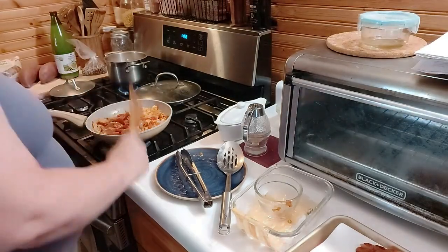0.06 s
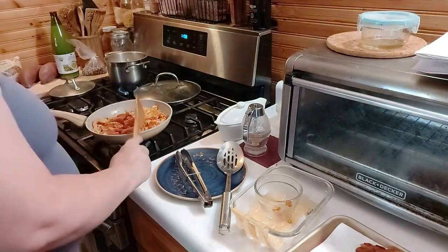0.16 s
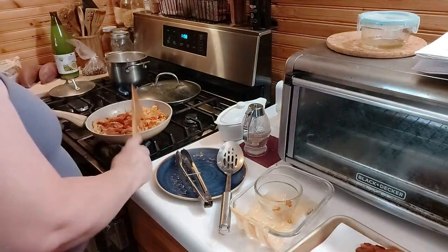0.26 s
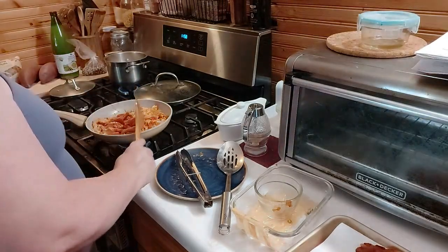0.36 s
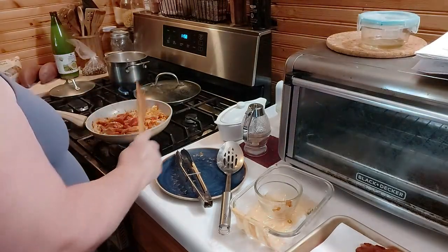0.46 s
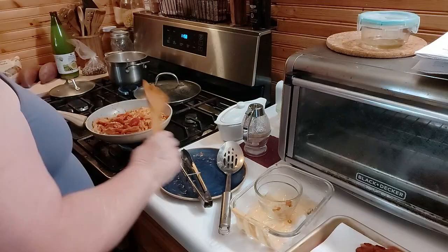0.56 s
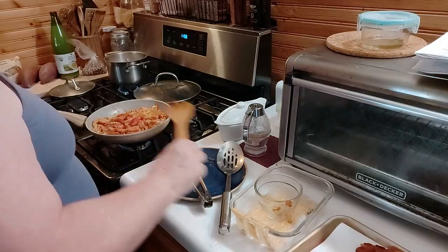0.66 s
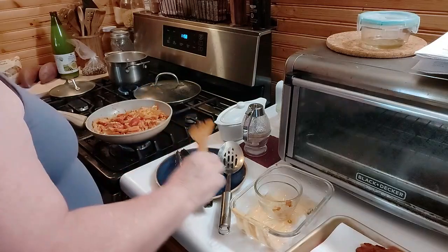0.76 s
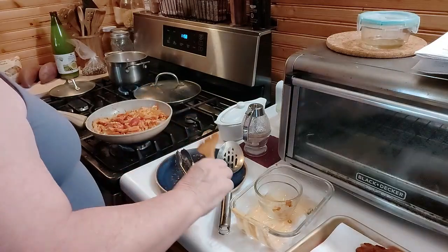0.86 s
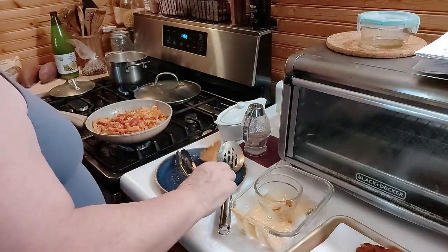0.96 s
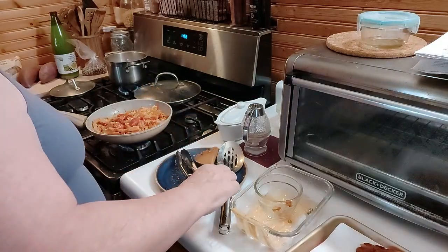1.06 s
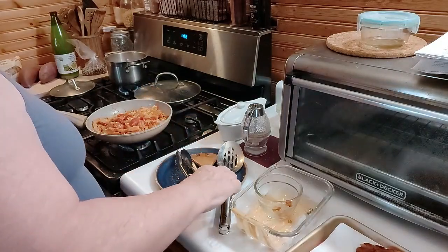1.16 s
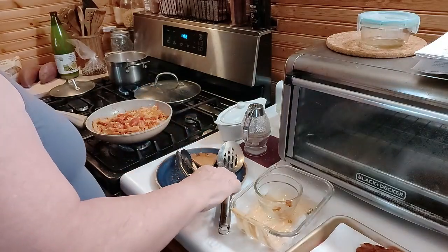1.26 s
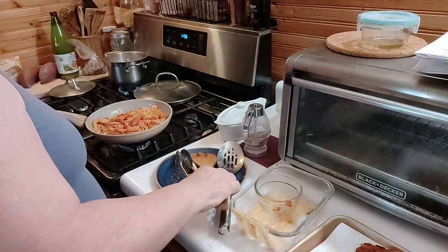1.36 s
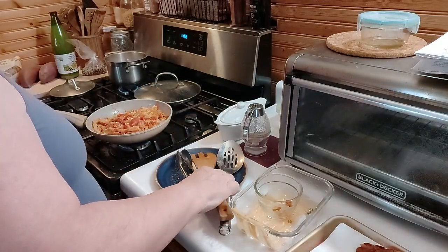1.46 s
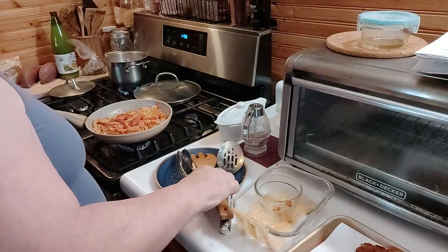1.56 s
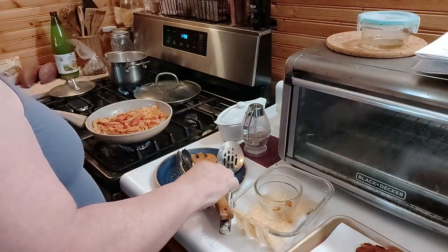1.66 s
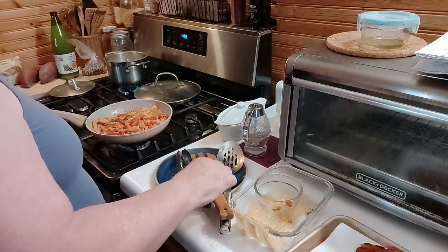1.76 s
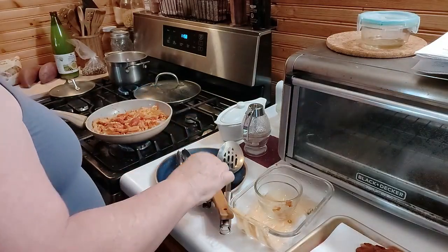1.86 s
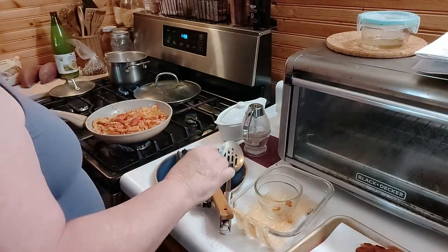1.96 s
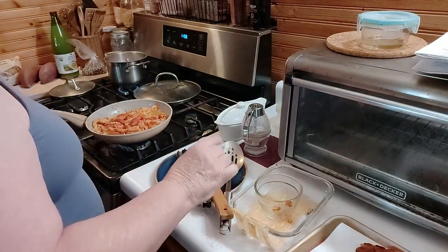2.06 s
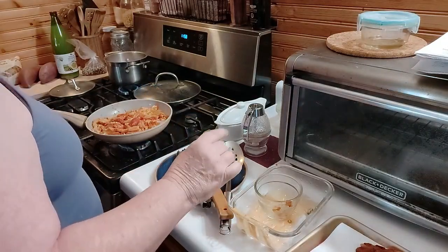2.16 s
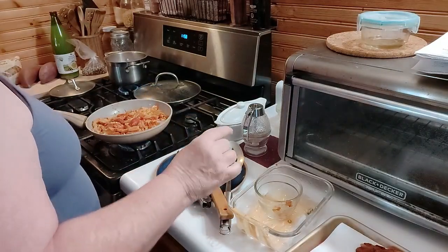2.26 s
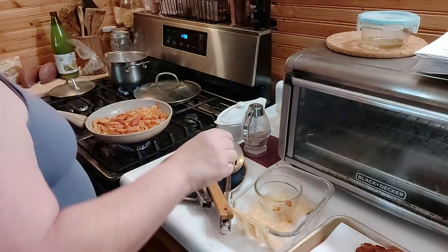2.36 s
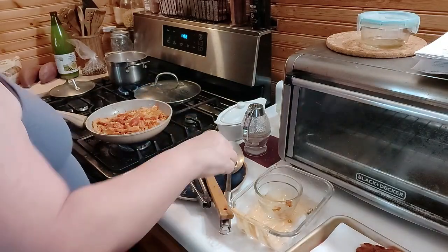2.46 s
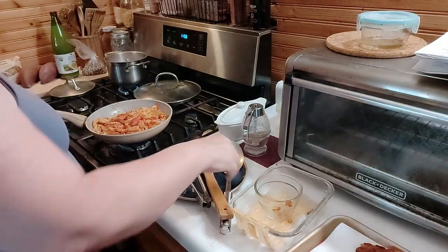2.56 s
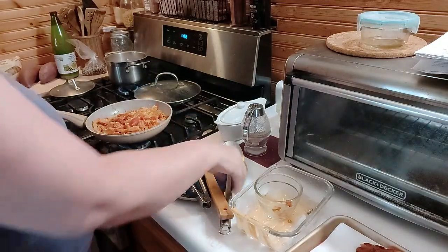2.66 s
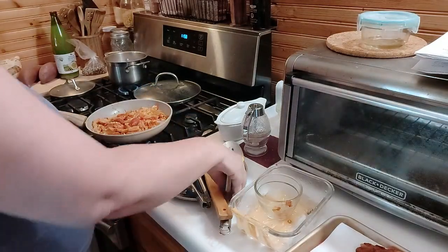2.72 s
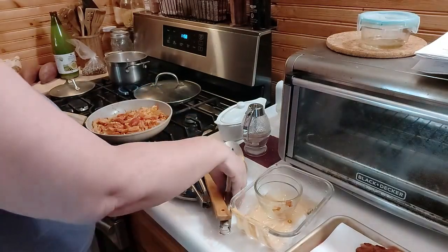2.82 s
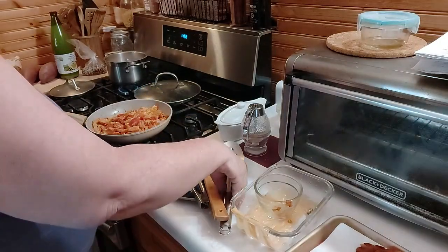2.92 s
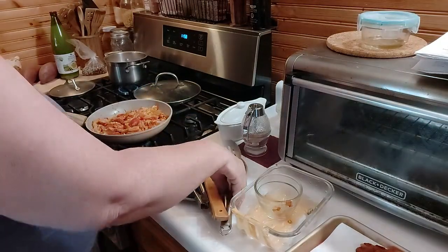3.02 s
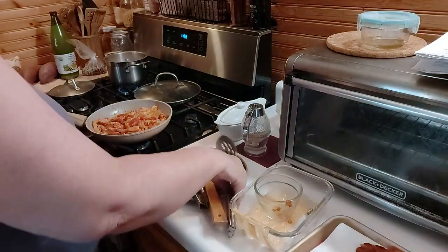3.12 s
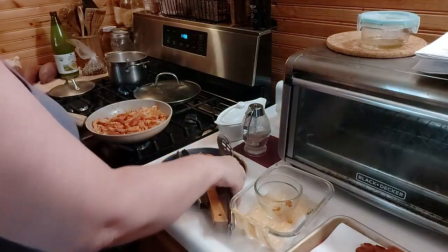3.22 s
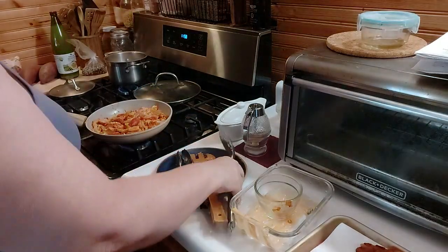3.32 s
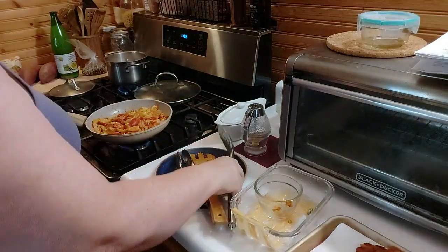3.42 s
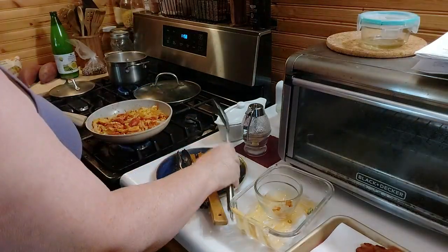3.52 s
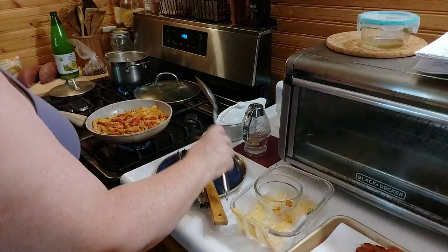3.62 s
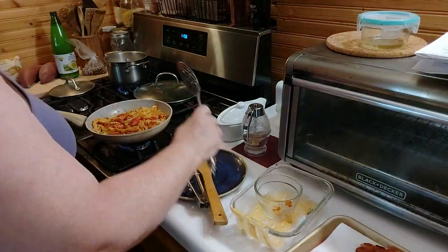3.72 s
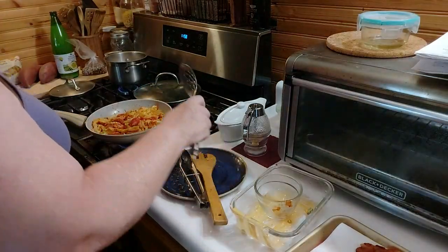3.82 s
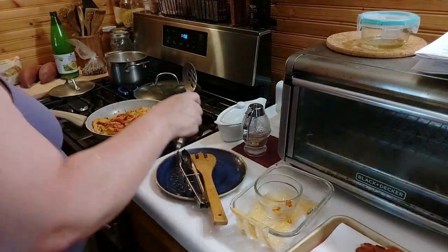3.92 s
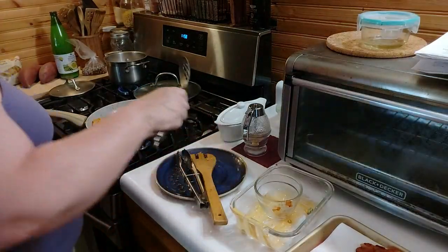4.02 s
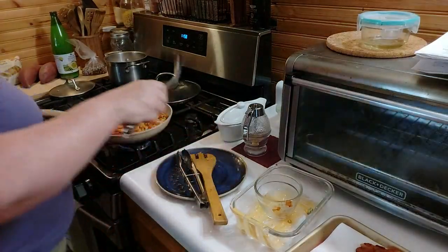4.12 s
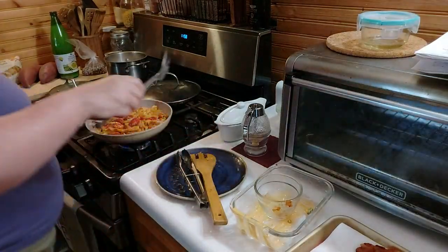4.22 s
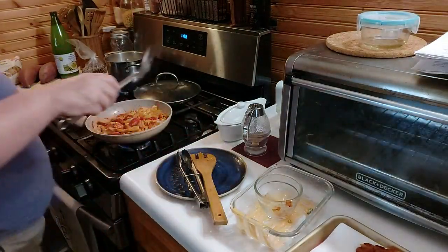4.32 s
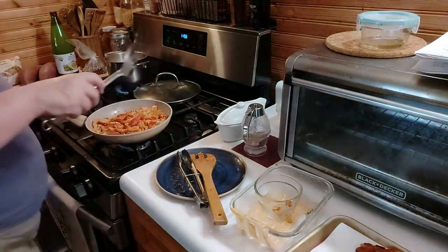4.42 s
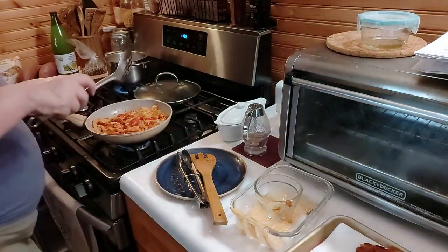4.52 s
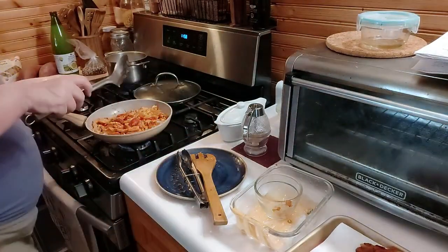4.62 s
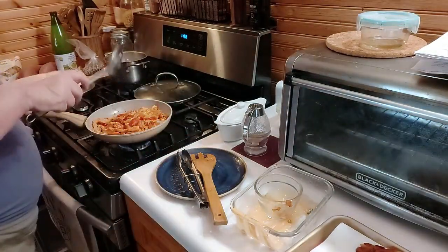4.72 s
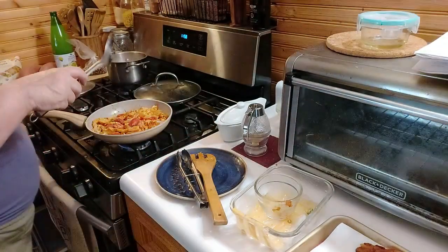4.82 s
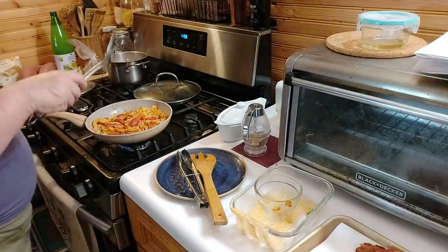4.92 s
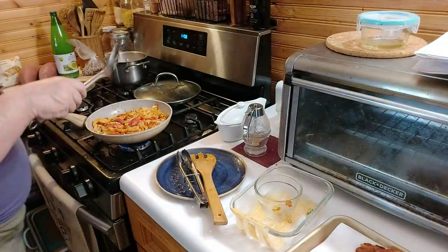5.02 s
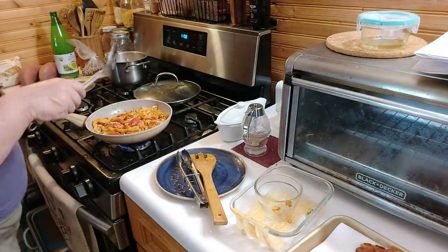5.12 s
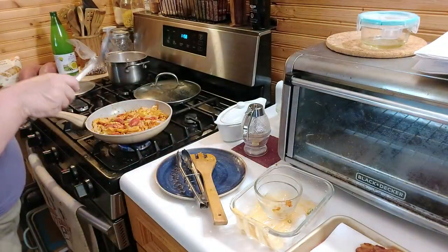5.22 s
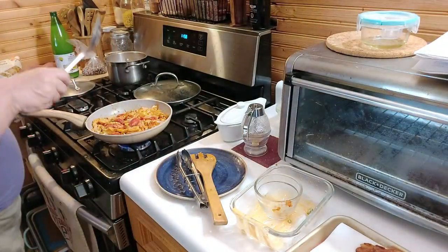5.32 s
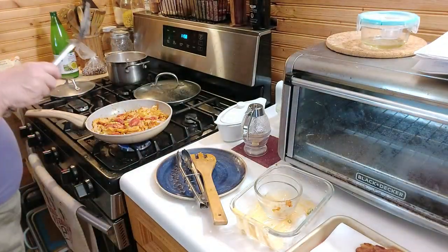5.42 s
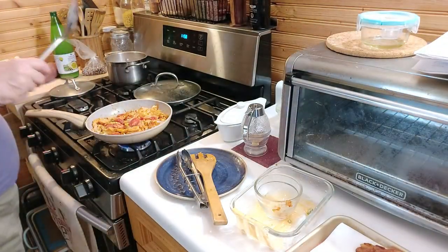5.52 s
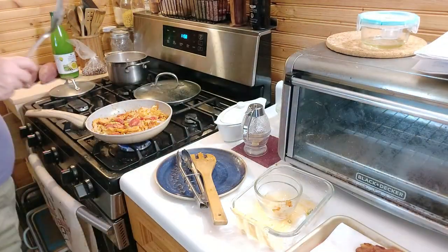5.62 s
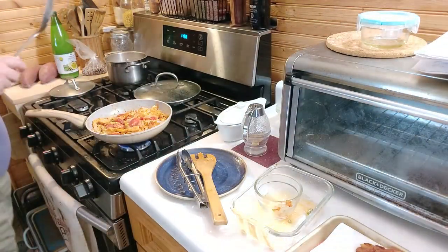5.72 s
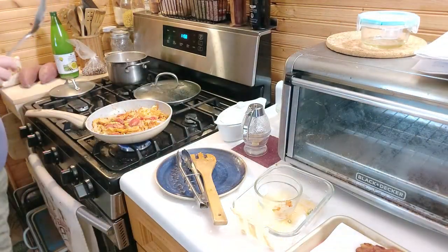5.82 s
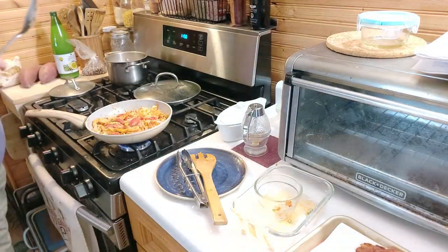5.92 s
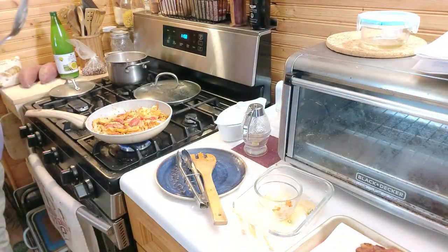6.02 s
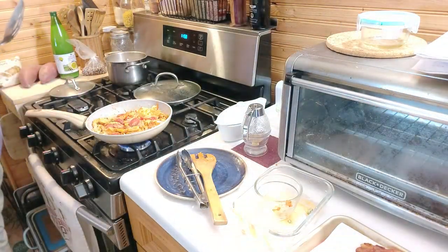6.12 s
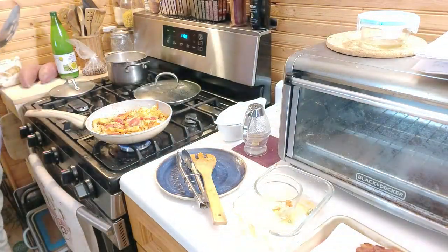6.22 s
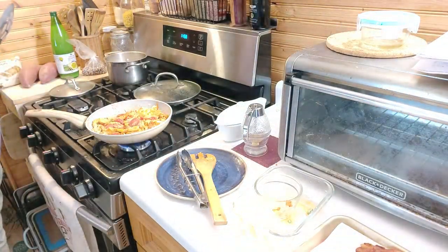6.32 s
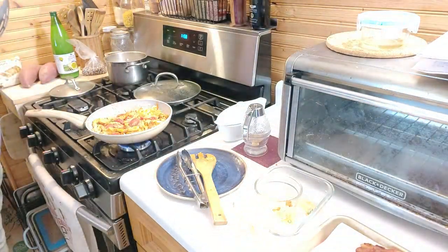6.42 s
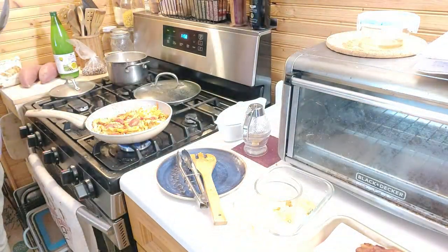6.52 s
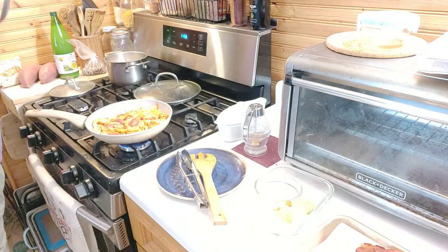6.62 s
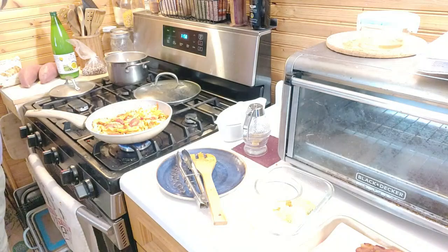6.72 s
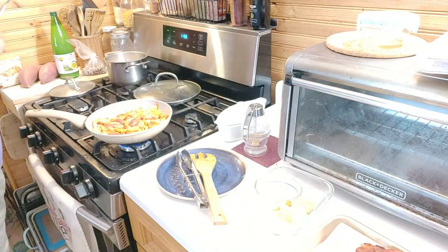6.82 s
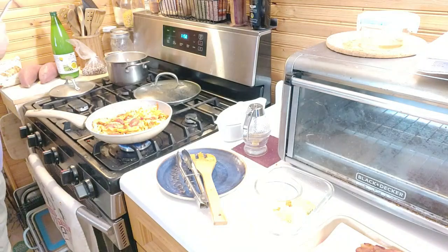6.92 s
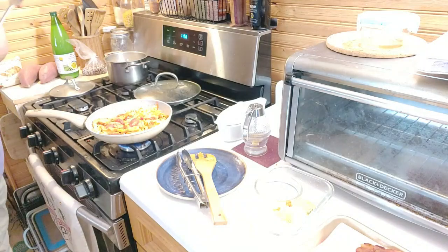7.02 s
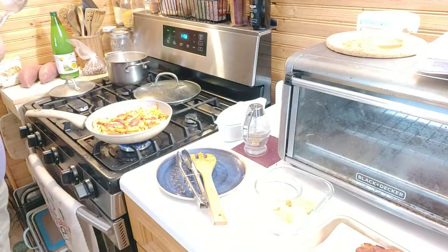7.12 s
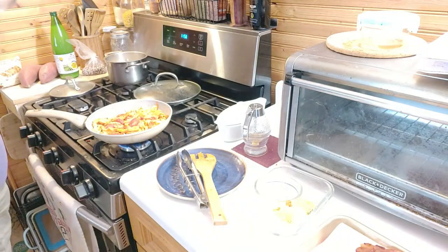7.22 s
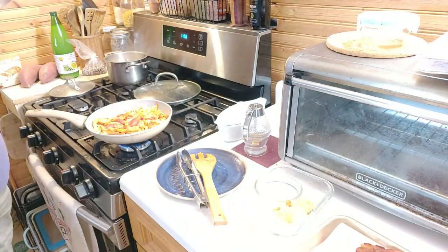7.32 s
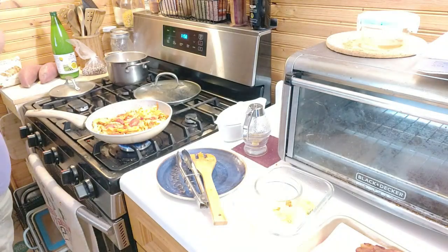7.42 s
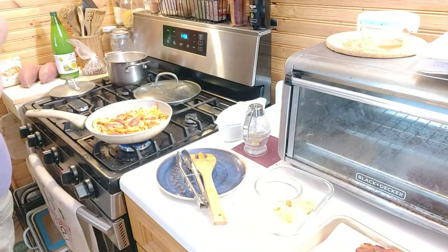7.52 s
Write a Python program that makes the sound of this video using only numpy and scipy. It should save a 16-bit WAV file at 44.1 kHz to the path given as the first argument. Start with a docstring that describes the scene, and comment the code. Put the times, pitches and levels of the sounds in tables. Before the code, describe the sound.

Wooden spatula knocks twice on a skillet rim, clatters onto a plate among steel tools, then a spoon is pulled free and taps a pot.

```python
"""In a small wood-panelled kitchen a wooden spatula knocks twice on a skillet's rim, then is laid on a plate
among steel tools; a steel spoon is worked loose and at last tapped on a pot. Each blow is a click ringing
body resonances and its own clack or thunk, sent to two close microphones by a straight path and many echoes.
Throughout lie a fridge's beating hum (sines and narrow noise), burner and air noise and a faint simmer
(banded noise), with brief wisps of hiss and, in the first half, four thin whistles (swelling narrow noise)."""
import sys
import numpy as np
from scipy import signal
from scipy.fft import rfft, irfft
from scipy.io import wavfile

SR = 44100
rng = np.random.default_rng(int(sys.argv[2]) if len(sys.argv) > 2 else 0)


def unload_audio(sound):
    """Save the sound as a 16-bit wav file, at the path given as the first command line argument."""
    columns = np.transpose(np.atleast_2d(sound))
    # keep every value between -1 and 1, then stretch to whole-number steps
    steps = np.round(np.clip(columns, -1, 1) * 32767)
    wavfile.write(sys.argv[1], SR, steps.astype(np.int16))


N = 333837

# Blows on each body: start_s, level_db (dry peak before brightening and room), own_pitch_hz,
# own_gain_db (of the blow's own resonance: a utensil's clack or the plate's dull thunk)
RIM_KNOCKS = [(.168, -4, 1480, -24), (.376, -6.5, 1490, -11)]
PLATE_CLATTER = [(1.095, -17, 1650, 2.9), (1.098, -25, 417, 28.7), (1.220, -30.5, 1210, 5.9),
                 (1.252, -26, 2010, 2.5), (1.476, -38, 433, 34.6), (1.517, -7.5, 2750, 2),
                 (1.524, -3, 1840, 1.9), (1.541, -11, 1410, 7.6), (1.595, -7.5, 2950, 6.4),
                 (1.600, -23, 1405, 25.3), (1.619, -25.5, 1420, 14), (2.925, -26, 1900, 3.4),
                 (2.935, -29, 440, 27), (3.211, -11, 1280, 2), (3.223, -2.5, 1850, 1.8),
                 (3.310, -15.5, 3600, 4), (3.347, -23, 1860, 7.7), (3.371, -40, 4000, 3),
                 (3.373, -28, 866, 26), (3.499, -22, 2080, 8)]
POT_TAP = [(4.759, -16, 1280, 1.3)]

# Resonances of the struck bodies: pitch_hz, width_hz, level_db (before the body's ring_db)
SKILLET_MODES = [(55, 8, -14), (72, 8, 14), (148, 15, 2), (363, 29, 2), (768, 32, 13), (1230, 60, 1.5),
                 (1665, 300, -0.5), (2825, 43, 6), (3455, 30, -11)]
PLATE_MODES = [(317, 31, 0.5), (436, 64, 4.5), (1406, 42, 2), (1890, 410, -6), (2500, 290, -12),
               (3090, 110, -3), (3940, 45, -4), (5550, 130, -14)]
POT_MODES = [(384, 20, 11.5), (527, 38, 16.5), (1106, 61, 11), (1490, 480, 9), (2170, 200, 1),
             (4050, 160, 6.5), (5400, 90, 4)]

# Broad colour of the contact click: frequency_hz, level_db (per Hz, relative)
SKILLET_CLICK = [(24, -50), (40, -26), (155, -6.5), (231, -12.5), (372, -3), (455, -8.5), (770, -6),
                 (1070, -8.5), (1210, -6), (8990, -25), (16000, -37)]
PLATE_CLICK = [(24, -36), (40, -15), (127, 2), (199, -46), (444, -10.5), (1070, -9.5), (1410, -14.5),
               (1590, -7), (3220, -11.5), (11000, -31), (16000, -55)]
POT_CLICK = [(35, -36), (60, 16), (227, 1), (363, 3), (1140, 13.5), (3670, -15.5), (4220, -10), (11500, 0),
             (16000, -20)]

# Time for the room's echoes to fall 60 dB: frequency_hz, decay_s
ROOM_T60 = [(60, 0.42), (150, 0.59), (400, 0.38), (1000, 0.31), (2500, .28), (6000, 0.25), (13000, 0.25)]

# Background levels before their flicker: time_s, air_and_burner_db, simmer_db
BACKGROUND = [(0, -53.5, -63), (.9, -56.5, -62.5), (2.2, -56.5, -63), (3, -56.5, -61), (3.7, -56.5, -62.5),
              (5, -55, -60.5), (7.57, -54, -61.5)]
# Colour of air and burner, then of the simmer: frequency_hz, level_db (per Hz, relative)
AIR_COLOUR = [(18, -38), (30, -15), (60, -12), (73, -1.5), (81, -25.5), (124, -12.5), (148, -19),
              (181, -14), (336, -14.5), (439, -17), (535, -17), (572, -15), (6000, -35), (7800, -75.5),
              (13200, -120)]
SIMMER_COLOUR = [(1760, -4), (3000, 0.5), (5800, -4), (8760, 1.5), (11400, 0), (13300, -6), (15100, -1.5),
                 (16000, -21.5)]
# Left-right correlation of the background noise: frequency_hz, likeness (-1 to 1, no unit)
LIKENESS = [(60, -0.16), (180, 1), (550, 0.13), (1650, -0.16), (4970, -0.11), (15000, -0.078)]

# Fridge motor, two close tones and a thin whine: pitch_hz in one row, level_db (rms before drift) in the other
MOTOR_HZ = (56.63, 58.52, 538.0)
MOTOR_DB = (-53.5, -64.5, -69)
# Narrow noisy lines beside the hum: pitch_hz, width_hz (of each of two passes), level_db (rms)
NOISY_LINES = [(61, 14, -64.5), (80.8, 25, -65), (119.65, 2.9, -64.5), (247.6, 3.4, -78.5),
               (333.4, 5.2, -67.5), (519.5, 18, -73)]

# Wisps of hiss: middle_s, length_s, centre_hz, level_db (rms before swell and flicker)
WISPS = [(2.616, .045, 12000, -59), (2.788, 0.03, 12100, -59), (3.725, .02, 14000, -60),
         (4.069, 0.046, 10400, -58.5), (4.433, .05, 11000, -59), (4.508, 0.057, 9500, -56.5),
         (5.226, 0.14, 8600, -62), (5.793, .16, 8500, -59.5), (5.85, 0.13, 1010, -70),
         (6.31, 0.12, 11400, -57), (6.328, 0.1, 4050, -61), (6.746, 0.077, 15000, -61),
         (6.817, 0.06, 14500, -58), (7.168, .015, 4000, -61), (7.467, 0.027, 5500, -55),
         (7.514, .033, 11000, -56.5)]
# Thin whistles: middle_s, length_s
WHISTLES = [(0.412, 0.4), (1.037, 0.14), (2.40, 0.16), (3.466, .13)]

# Background
HUM_CREST_S = 3.87   # a moment when all motor tones crest together
WISP_Q = 1.9   # centre over width, each of two passes
WHISTLE_HZ, WHISTLE_WIDTH_HZ, WHISTLE_DB = 4340, 200, -67.5   # level is rms before swell and flicker

# Room
ECHOES_PER_S, ECHO_SPREAD_DB, ECHO_BUILD_S = 5000, 2, 0.0045
NEAR_T60_S, NEAR_BUILD_S = 0.035, 0.001   # scatter from worktop, wall and appliances close by
DIRECT_DB = -10.5   # straight path of the whole blow, against the near scatter
OWN_DIRECT_DB = 3.5   # extra straight share of the clack or thunk

# Blows
OWN_Q = 4.5   # pitch over width of the clack or thunk, each of two passes
EDGE_HZ = 4000   # harder blows are brighter above this
EDGE_PER_DB, EDGE_FROM_DB = 0.2835, -10.5   # dB of edge per dB of peak, counted from this peak

# Microphones
MIC_GAP_S = 0.00033   # sound's travel time between the two
LEFT_DB = 1.24   # left over right
CUTOFF_HZ = 15950


def from_db(db):
    """Amplitude of a level in dB."""
    return 10 ** (np.asarray(db) / 20)


def rms_one(x):
    """Scale to an rms of 1."""
    return x / np.sqrt(np.mean(x ** 2) + 1e-20)


def at_hz(points, hz):
    """Read a frequency table along a logarithmic pitch axis."""
    table_hz, values = np.array(points).T
    return np.interp(np.log(hz), np.log(table_hz), values)


def resonate(x, hz, width_hz):
    """Two-pole resonance with gain 1 on top."""
    r = np.exp(-np.pi * width_hz / SR)
    top = np.array([1, 0, -1]) * (1 - r * r) / 2
    return signal.lfilter(top, [1, -2 * r * np.cos(2 * np.pi * hz / SR), r * r], x)


def resonate_twice(x, hz, width_hz):
    """Two equal resonances in a row, for steeper skirts."""
    return resonate(resonate(x, hz, width_hz), hz, width_hz)


def drift(rate_hz):
    """Slow random wander of spread 1: noise at every 40th sample through a double one-pole low-pass."""
    step, settle = 40, 2000
    r = np.exp(-2 * np.pi * rate_hz * step / SR)
    noise = rng.standard_normal(N // step + settle + 2)
    slow = signal.lfilter([1], [1, -2 * r, r * r], noise)[settle:]
    return np.interp(np.arange(N) / step, np.arange(len(slow)), rms_one(slow))


def half_octaves(x, low_hz=30, high_hz=20000):
    """Yield centre Hz and band of x for the bands within the limits; x holds two signals used in turn."""
    edges = 34 * 2 ** np.arange(0, 9.1, 0.5)
    for k, (low, high) in enumerate(zip(edges, edges[1:])):
        if low_hz < low and high < high_hz:
            band_pass = signal.butter(2, [low, high], "band", fs=SR, output="sos")
            yield np.sqrt(low * high), signal.sosfilt(band_pass, x[k % 2])


def banded_noise(colour, patchy_db, low_hz, high_hz):
    """Stereo noise whose bands have their own level, flicker and left-right likeness; rms 1."""
    out, together = 0, drift(0.57)
    draws = rng.standard_normal((2, 2, N))
    for hz, (mid, side) in half_octaves(draws, low_hz, high_hz):
        alike = np.clip(at_hz(LIKENESS, hz), -1, 1)
        flicker_db = patchy_db * (0.6 * together + drift(4.7))
        gain = from_db(at_hz(colour, hz) + flicker_db)
        out = out + gain * (np.sqrt(1 + alike) * mid + np.sqrt(1 - alike) * side * [[1], [-1]])
    return rms_one(out)


def background_level(column):
    """Gain over time from one level column of the background table."""
    table = np.transpose(BACKGROUND)
    return from_db(np.interp(np.arange(N) / SR, table[0], table[column]))


def burner_and_air():
    """Broad noise of burner and air, nearly steady in every band."""
    return background_level(1) * banded_noise(AIR_COLOUR, patchy_db=-0.1, low_hz=30, high_hz=9000)


def fridge():
    """Two close motor tones beat about twice a second; a thin whine and narrow noisy lines join them."""
    s = np.arange(N) / SR
    hum = sum(np.sqrt(2) * from_db(db) * np.cos(2 * np.pi * hz * (s - HUM_CREST_S))
              for hz, db in zip(MOTOR_HZ, MOTOR_DB))
    lines = sum(from_db(db) * rms_one(resonate_twice(rng.standard_normal(N), hz, width))
                for hz, width, db in NOISY_LINES)
    return hum * from_db(1.5 * drift(1.2)) + lines


def simmer():
    """Faint treble hiss of the simmering pan, as banded noise."""
    return background_level(2) * banded_noise(SIMMER_COLOUR, patchy_db=0.7, low_hz=2000, high_hz=20000)


def wisps_and_whistles(size=24000):
    """Brief swells of noise around one pitch, broad wisps and narrow whistles, unlike in the two channels."""
    out = np.zeros((2, N + size))
    s = (np.arange(size) - size // 2) / SR
    broad = [(middle, length, hz, hz / WISP_Q, db) for middle, length, hz, db in WISPS]
    narrow = [(middle, length, WHISTLE_HZ, WHISTLE_WIDTH_HZ, WHISTLE_DB) for middle, length in WHISTLES]
    for middle, length, hz, width, db in broad + narrow:
        hiss = resonate_twice(rng.standard_normal((2, size)), hz, width)
        swell = np.exp(-(2 * s / length) ** 2)
        at = round(middle * SR)
        out[:, at:at + size] += from_db(db) * rms_one(hiss) * swell
    return out[:, size // 2:size // 2 + N]


def kitchen_echoes(echo_db, size=20000):
    """Uneven echoes from all sides, most reaching one microphone first: a near cluster and the room."""
    s = np.arange(size) / SR
    chance, bearing = rng.random((2, size))
    size_db = ECHO_SPREAD_DB * np.minimum(rng.exponential(1, size), 3)
    echoes = from_db(size_db) * rng.choice([-1, 1], size)
    echoes *= chance < ECHOES_PER_S / SR
    spray = np.zeros((2, size))
    for mic, sign in enumerate((1, -1)):
        delay = (1 + sign * (2 * bearing - 1)) * MIC_GAP_S * SR / 2
        at = np.arange(size) + np.round(delay).astype(int)
        np.add.at(spray[mic], np.minimum(at, size - 1), echoes)
    near = spray * from_db(-60 * s / NEAR_T60_S) * (1 - np.exp(-s / NEAR_BUILD_S))
    late = spray * (1 - np.exp(-s / ECHO_BUILD_S))
    # every band dies at its own rate; alternate bands are flipped in polarity
    room = sum(band * (-1) ** k * from_db(-60 * s / at_hz(ROOM_T60, hz))
               for k, (hz, band) in enumerate(half_octaves([late, late])))
    return (rms_one(near) + from_db(echo_db) * rms_one(room)) / np.sqrt(size)


def contact_click(colour, size=12288):
    """The earliest-sounding (minimum-phase) pulse with this colour, by folding its cepstrum."""
    hz = np.maximum(np.fft.rfftfreq(size, 1 / SR), 10)
    cepstrum = irfft(np.log(from_db(at_hz(colour, hz))))
    cepstrum[1:size // 2] *= 2
    cepstrum[size // 2 + 1:] = 0
    return irfft(np.exp(rfft(cepstrum)))


def blows(table, modes, colour, ring_db, edge_db, echo_db, left_lag):
    """Each blow is a coloured click with body modes, a clack or thunk and fresh echoes; left_lag in samples."""
    out = np.zeros((2, N + 40000))
    click = contact_click(colour)
    impulse = signal.unit_impulse(len(click))
    high_pass = signal.butter(2, EDGE_HZ, "high", fs=SR, output="sos")
    for start, peak_db, own_hz, own_db in table:
        luck_db = rng.normal(0, 1.5, len(modes))   # where it is struck weights the modes
        ring = sum(from_db(db + ring_db + extra) * resonate(impulse, hz, width)
                   for (hz, width, db), extra in zip(modes, luck_db))
        clack_or_thunk = from_db(own_db) * resonate_twice(click, own_hz, own_hz / OWN_Q)
        blow = click + ring + clack_or_thunk
        bright_db = edge_db + EDGE_PER_DB * (peak_db - EDGE_FROM_DB)
        shaped = blow + (from_db(bright_db) - 1) * signal.sosfilt(high_pass, blow)
        paths = kitchen_echoes(echo_db)
        paths[[0, 1], [round(left_lag), 0]] += from_db(DIRECT_DB)   # straight path, later on the left
        heard = signal.fftconvolve(shaped[None], paths, axes=1)
        heard[:, :len(click)] += from_db(OWN_DIRECT_DB) * clack_or_thunk   # this part arrives drier
        at = round(start * SR)
        out[:, at:at + heard.shape[1]] += from_db(peak_db) * heard / np.abs(blow).max()
    return out[:, :N]


def skillet_knocks():
    """The wooden spatula on the skillet's rim, well into the room's echoes."""
    return blows(RIM_KNOCKS, SKILLET_MODES, SKILLET_CLICK, ring_db=-13.5, edge_db=-1.0, echo_db=12.5, left_lag=5)


def plate_clatter():
    """Spatula, plate and steel tools, then the spoon worked loose: clacks and dull thunks, weaker room echoes."""
    return blows(PLATE_CLATTER, PLATE_MODES, PLATE_CLICK, ring_db=0.0, edge_db=5.5, echo_db=-1.5, left_lag=2)


def pot_tap():
    """The steel spoon on the pot, whose modes are lifted over the click."""
    return blows(POT_TAP, POT_MODES, POT_CLICK, ring_db=5.5, edge_db=-3.0, echo_db=10.5, left_lag=9)


def scene():
    """Blows in the kitchen over the fridge, burner and simmer."""
    spurts = from_db(1.27 * drift(37.0))   # hiss and wisps come in quick spurts
    background = burner_and_air() + fridge() + spurts * (simmer() + wisps_and_whistles())
    return background + skillet_knocks() + plate_clatter() + pot_tap()


def record(dry):
    """The left microphone is a little louder; a steep low-pass cuts the top on both."""
    tilted = dry * from_db([[LEFT_DB / 2], [-LEFT_DB / 2]])
    low_pass = signal.cheby2(16, 70, CUTOFF_HZ * 1.02, fs=SR, output="sos")   # 70 dB down at its edge
    return signal.sosfilt(low_pass, tilted)


dry = scene()
out = record(dry)
unload_audio(out)
```